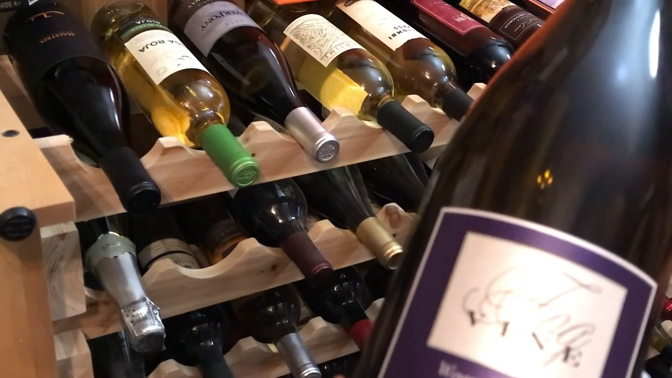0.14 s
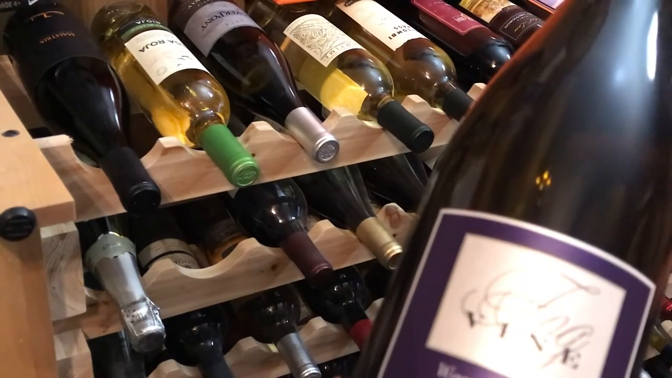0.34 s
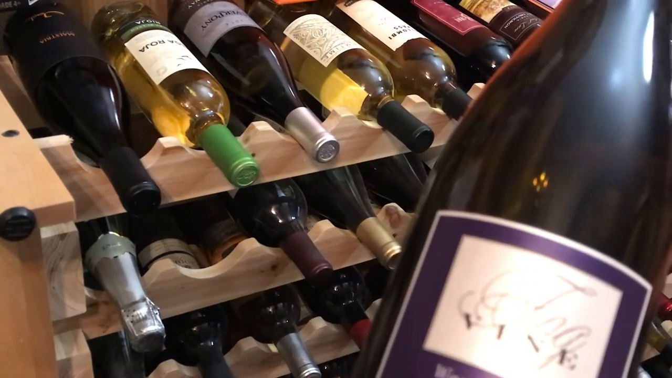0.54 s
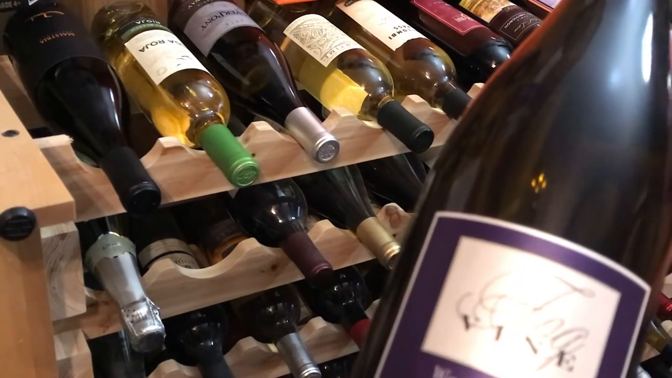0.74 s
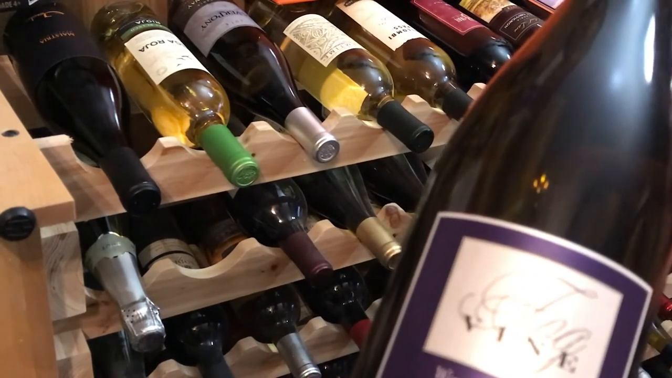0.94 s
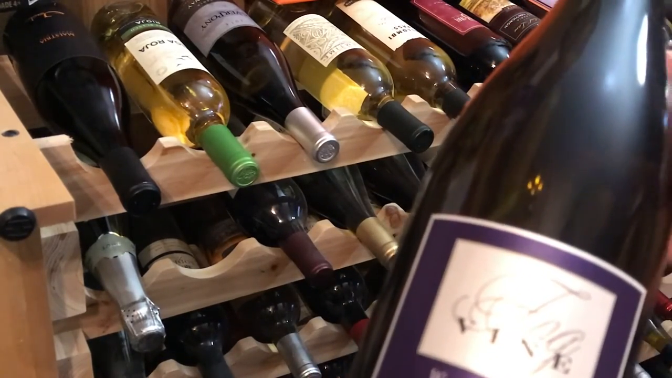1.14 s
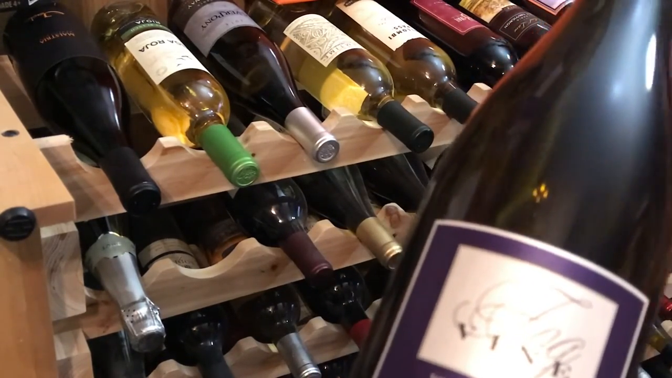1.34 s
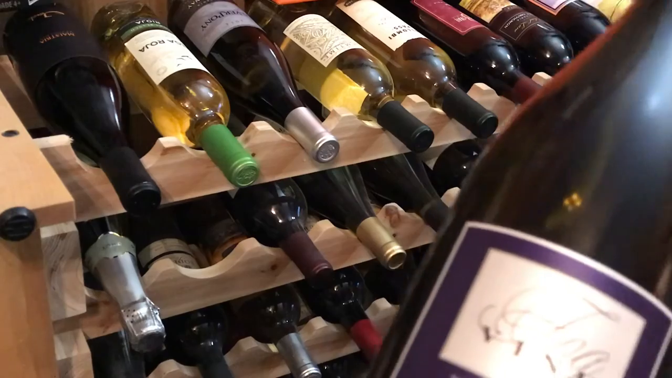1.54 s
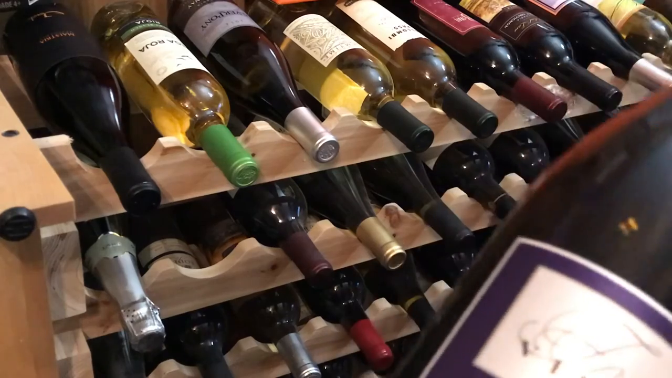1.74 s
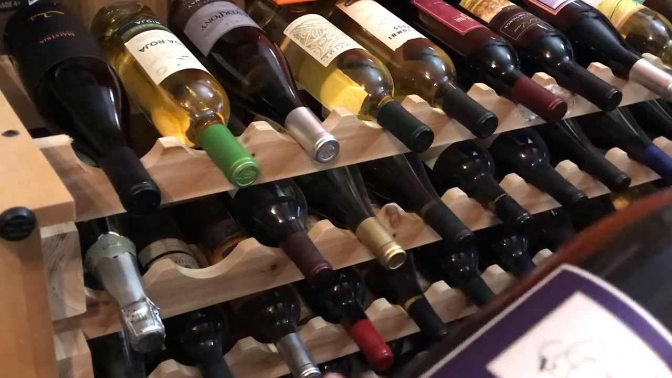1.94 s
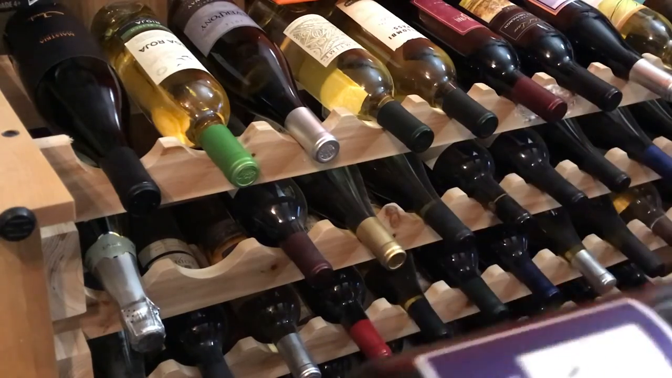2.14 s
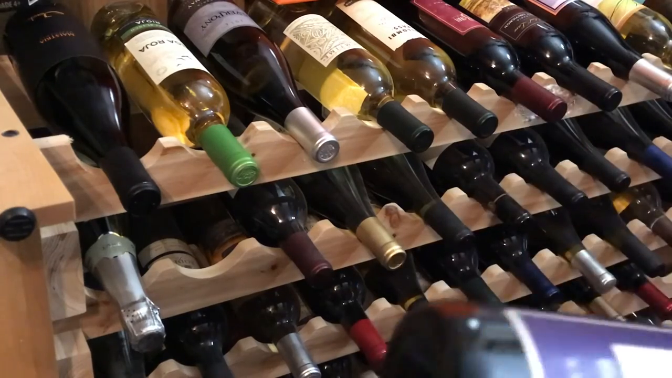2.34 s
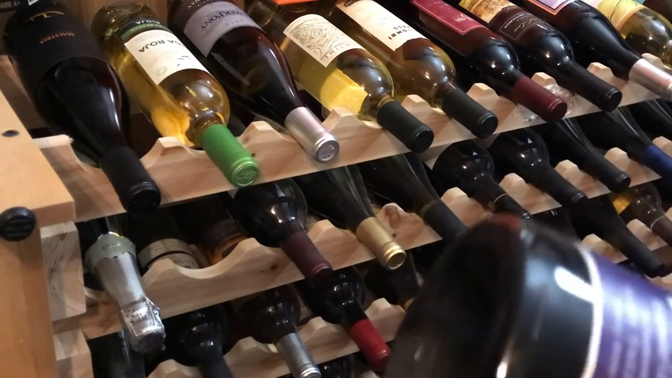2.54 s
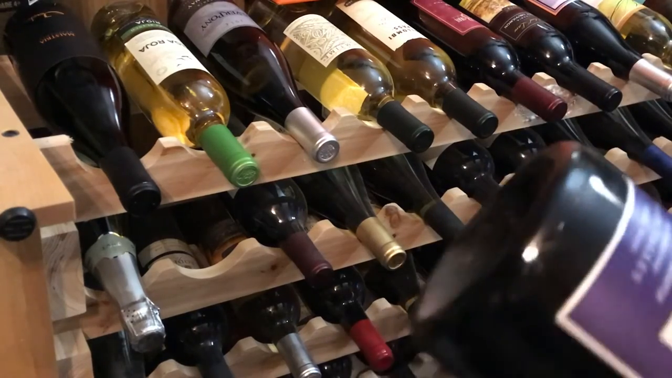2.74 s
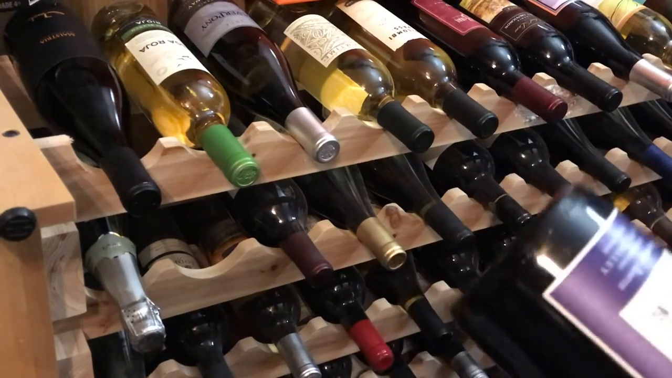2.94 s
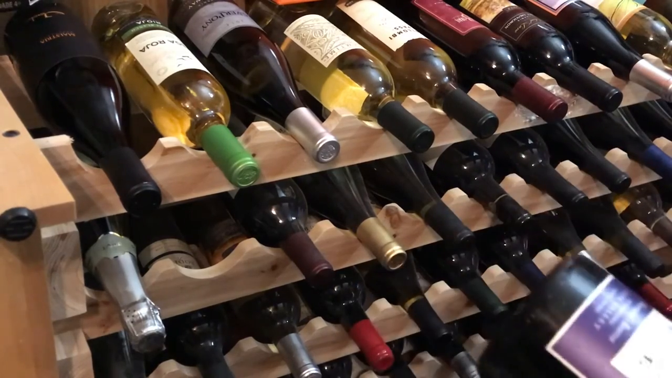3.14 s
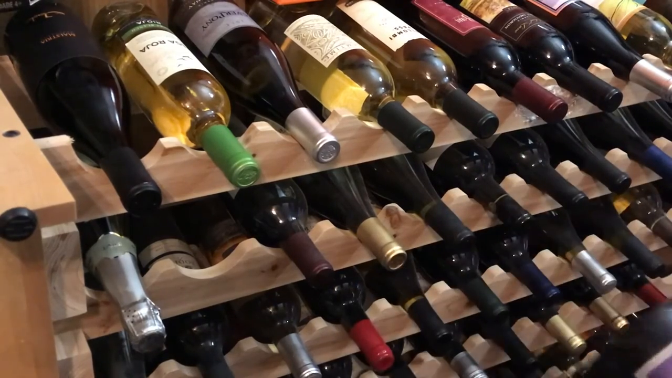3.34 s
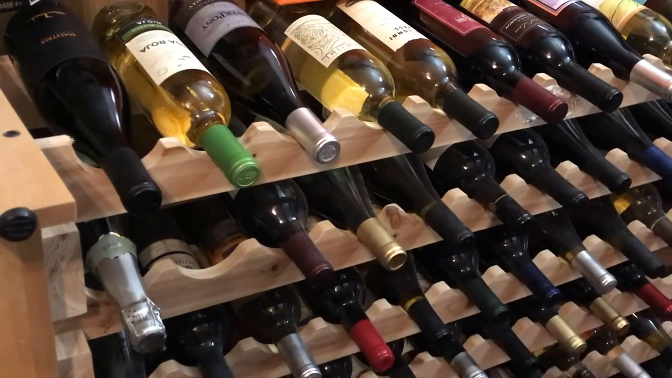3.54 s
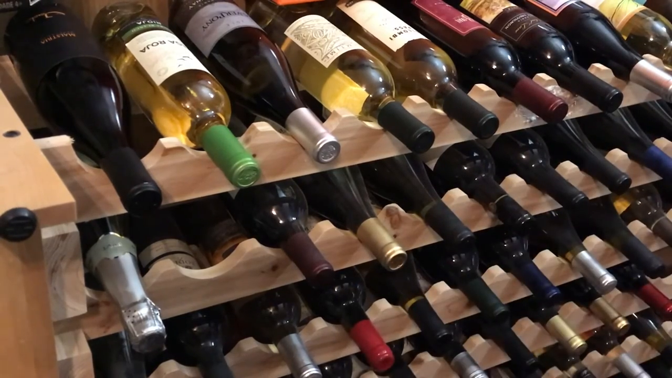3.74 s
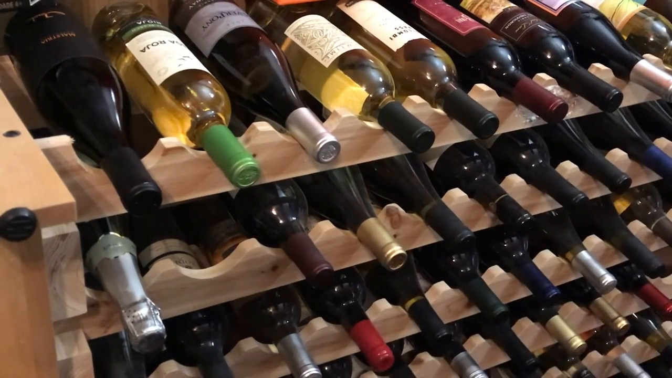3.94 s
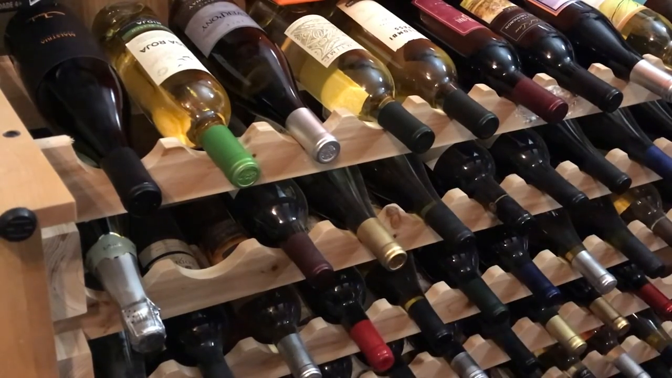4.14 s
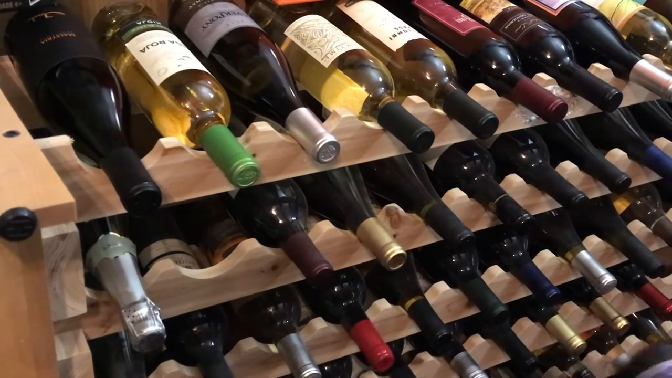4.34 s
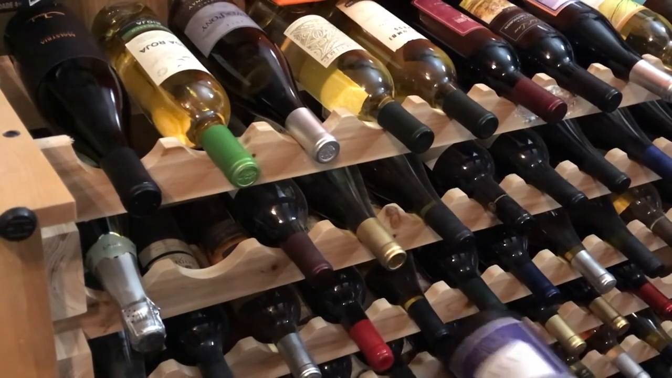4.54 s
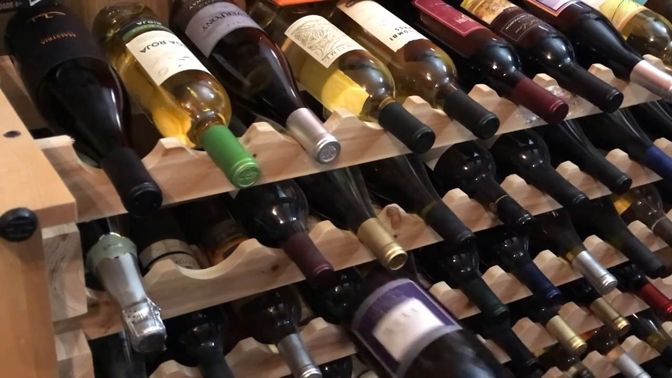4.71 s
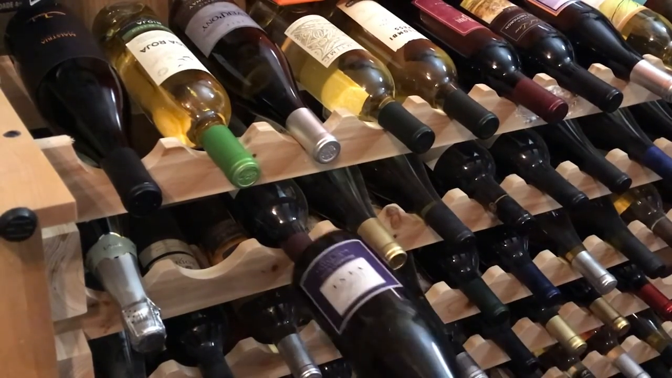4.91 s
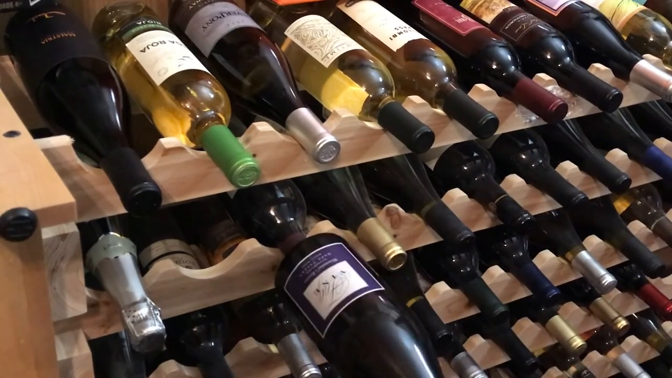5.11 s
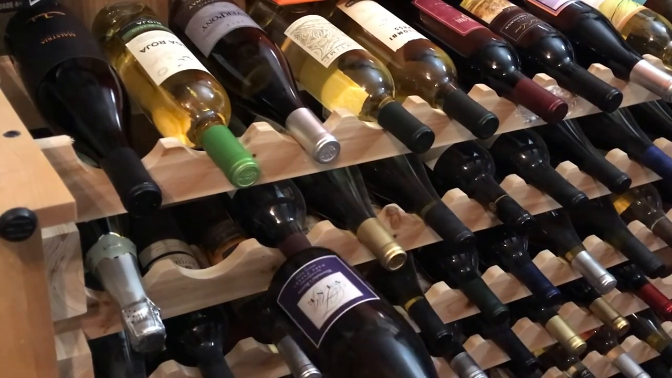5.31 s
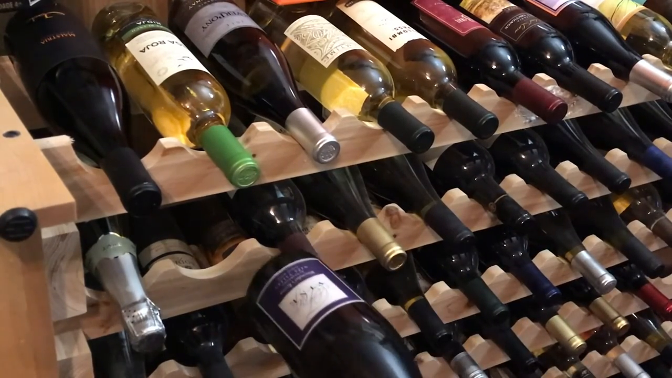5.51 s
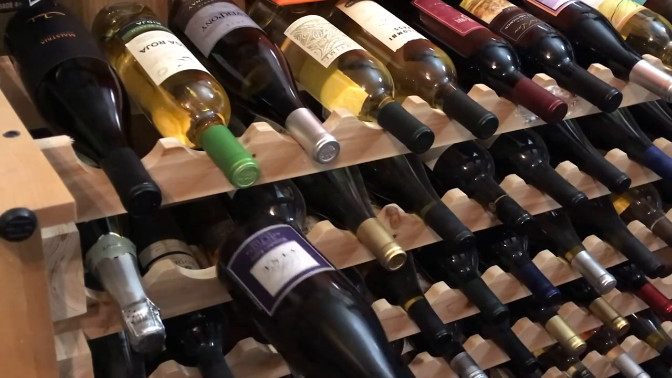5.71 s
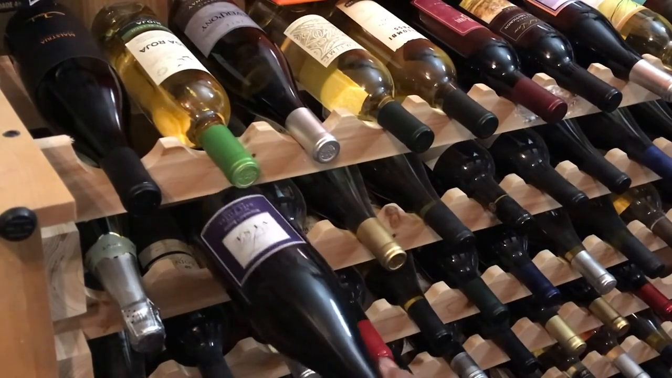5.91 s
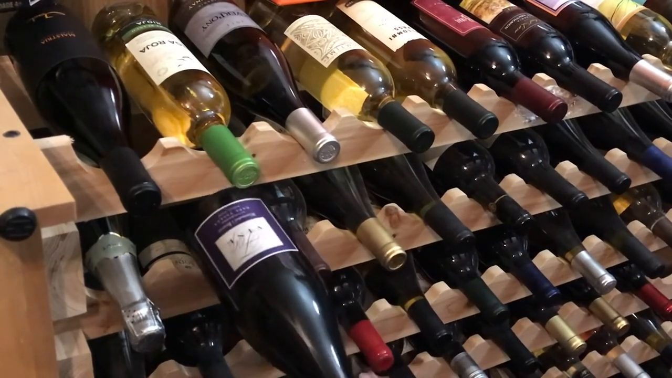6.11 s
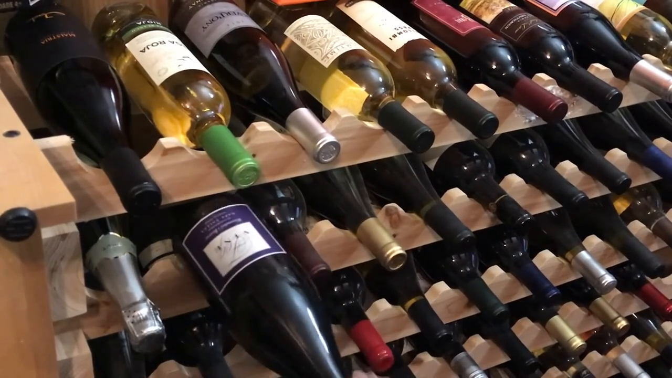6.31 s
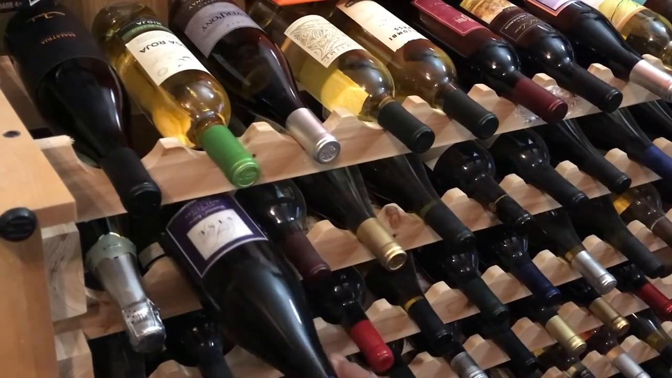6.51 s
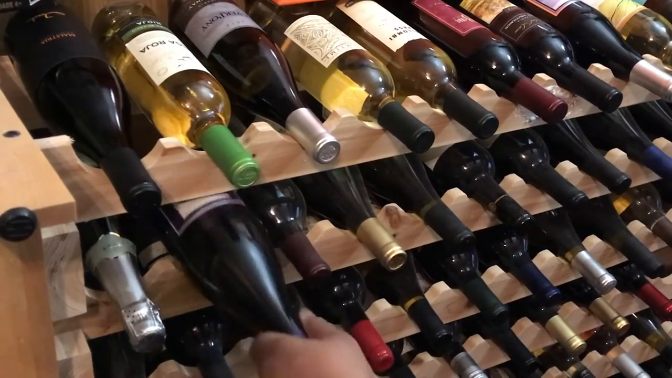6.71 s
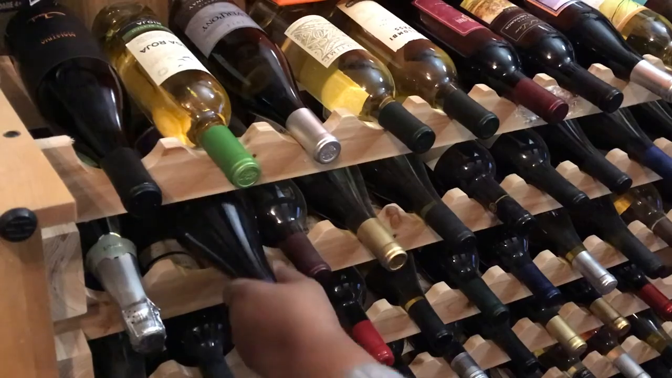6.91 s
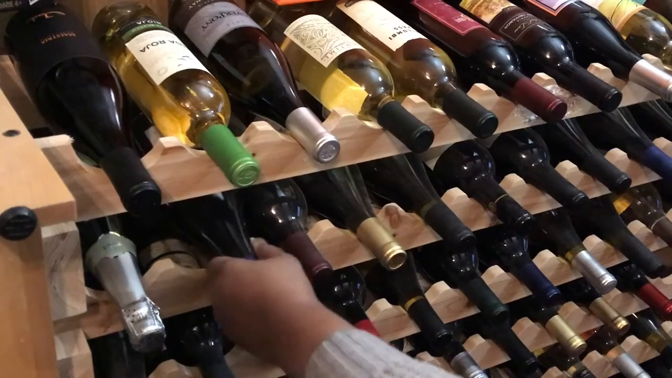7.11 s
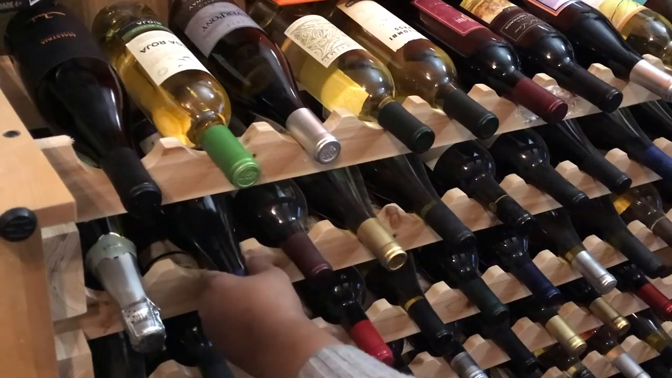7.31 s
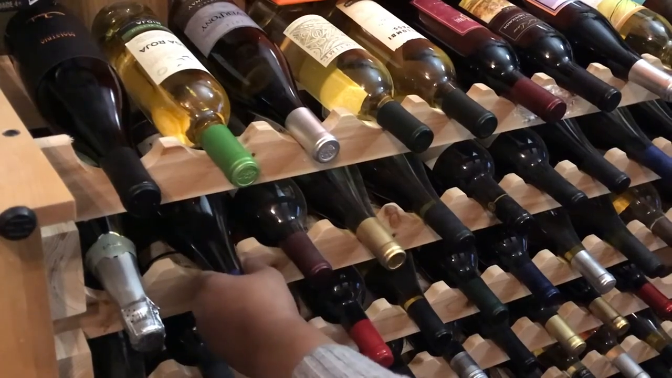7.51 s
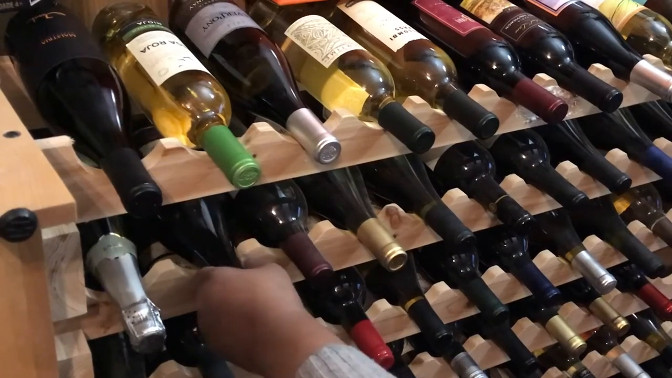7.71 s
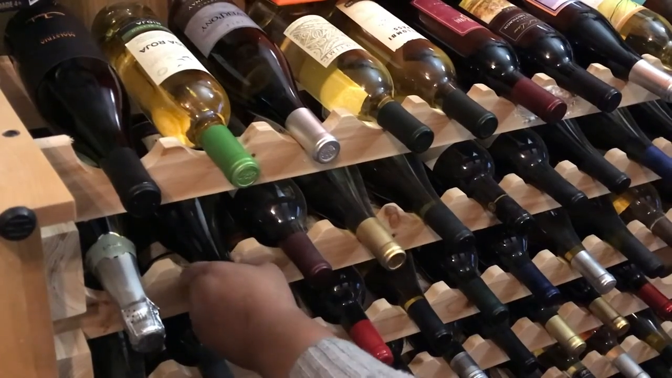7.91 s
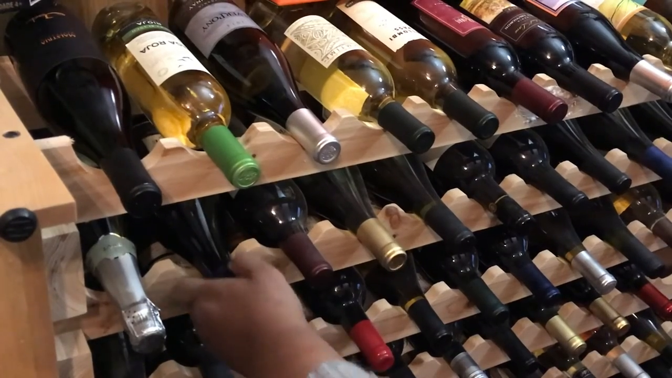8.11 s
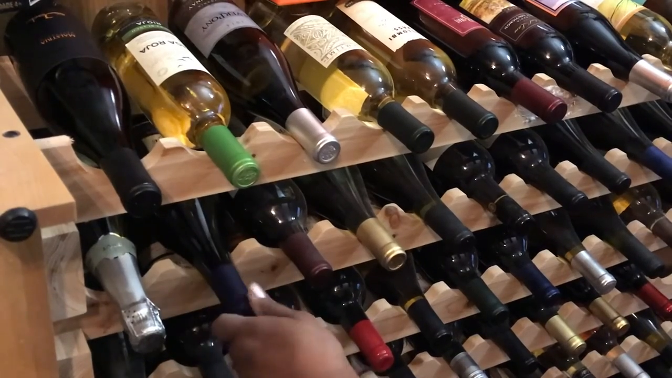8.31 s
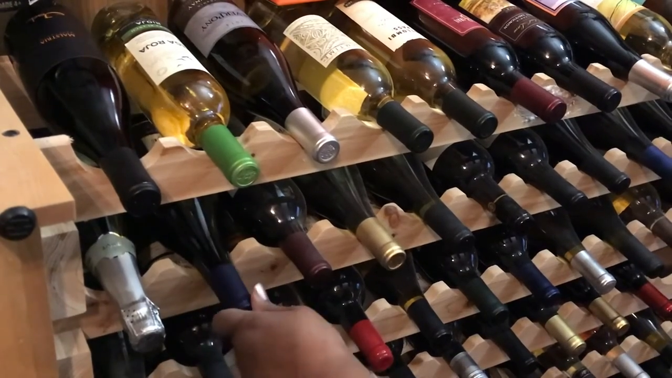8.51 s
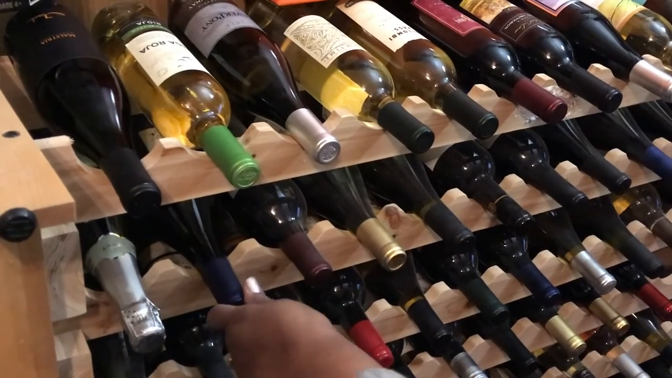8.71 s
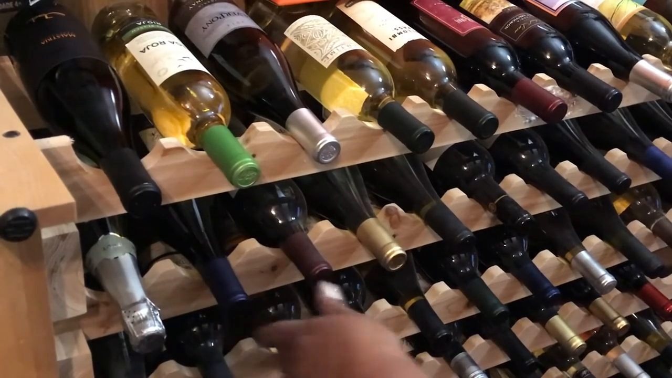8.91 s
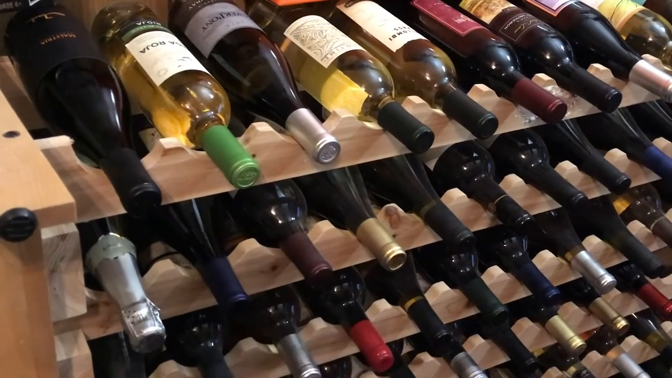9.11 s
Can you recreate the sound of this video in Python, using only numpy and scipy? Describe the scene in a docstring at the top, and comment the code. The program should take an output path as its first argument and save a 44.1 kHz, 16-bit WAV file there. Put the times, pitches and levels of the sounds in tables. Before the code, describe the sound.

In a quiet indoor room, fingertips tap a wine bottle with small bright ticks, then skin rubs and squeaks faintly on the glass as it is turned. A sharp clink against a neighbouring bottle follows, then wooden knocks, a short rising scrape and a loud glassy clunk as it slides into the rack. Close small microphone, faint air and hum.

```python
"""In a quiet room, a wine bottle is turned in the hand and then slid back into a full wooden rack.
Struck glass and wood are sums of dying tones set off by short blows; fingers, sleeve and sliding
contacts are friction noise, which also makes the glass sing. Squeaks are short gliding tones, and
creaks are trains of small slips. Room echoes, still air, a low rumble and a faint hum lie around it."""
import sys
import numpy as np
from scipy import signal
from scipy.fft import rfft, irfft, next_fast_len
from scipy.io import wavfile

SR = 44100
rng = np.random.default_rng(int(sys.argv[2]) if len(sys.argv) > 2 else 0)


def bounce(signal):
    """Save signal as a 16-bit WAV file at the path given by the first command-line argument."""
    frames = np.transpose(np.atleast_2d(signal))
    limited = np.clip(frames, -1, 1)
    pcm = np.round(limited * 32767).astype(np.int16)
    wavfile.write(sys.argv[1], SR, pcm)


N = 403507
TIME = np.arange(N) / SR
AGE = TIME[:SR]   # time since a blow, up to one second

# Tones of the bottle in the hand. Each row: pitch in Hz, level when struck in dB,
# time to fall 60 dB in seconds, level when rubbed in dB.
HELD_MODES = [(2220, -17.5, 0.23, -1.5), (2804, -23, 0.093, -10), (3622, -17, 0.13, 0.5),
              (3974, -6, 0.15, -4), (5460, -14.5, 0.041, -0.5), (5860, -16, 0.17, -4),
              (6216, -14.5, .085, -12), (7130, -24, 0.073, -22), (8020, -19.5, 0.086, -12),
              (11350, -19.5, 0.092, -6), (13060, -17, .08, -20)]
# When the sliding tones glide: start and end in seconds.
GLIDE_SPAN = (6.38, 6.67)


def from_db(db):
    """Turn decibels into a gain."""
    return np.exp(np.asarray(db) * (np.log(10) / 20))


def rms_one(x):
    """Scale a lasting sound to unit rms."""
    return x / np.sqrt(np.mean(x ** 2) + 1e-20)


def unit_blow(x):
    """Scale a blow to the energy of 20 ms at unit rms."""
    return x / np.sqrt(np.sum(x ** 2) / (.02 * SR) + 1e-20)


def at_hz(points, hz):
    """Read a table of (Hz, value) between its points, on a log-frequency axis."""
    f, value = np.transpose(points)
    return np.interp(np.log(hz), np.log(f), value)


def butter(x, hz, kind, order=2):
    """Filter out lows, highs or both, using only the past of the sound."""
    sos = signal.butter(order, np.clip(hz, 10, .45 * SR), kind, fs=SR, output="sos")
    return signal.sosfilt(sos, x)


def coloured(x, spectrum):
    """Shape a sound with a spectrum that falls away beyond its ends; rms 1."""
    size = next_fast_len(len(x))
    hz = np.maximum(np.arange(size // 2 + 1) * SR / size, 1)
    low_skirt = 1 / (1 + (.7 * spectrum[0][0] / hz) ** 4)
    high_skirt = 1 / (1 + (.7 * hz / spectrum[-1][0]) ** 6)
    gain = from_db(at_hz(spectrum, hz)) * low_skirt * high_skirt
    return rms_one(irfft(rfft(x, size) * gain, size)[:len(x)])


def drift(rate):
    """Wander at random between normal draws of spread 1, 'rate' draws a second."""
    knots = rng.standard_normal(4000)
    return np.interp(TIME * rate, np.arange(len(knots)), knots)


def grains(per_s, spread_db):
    """Scatter tiny slips of uneven size and sign at random times; rms 1."""
    chance = rng.random(N) * SR / per_s
    at = np.flatnonzero(chance < 1)
    out = np.zeros(N)
    size_db = spread_db * np.minimum(-np.log(chance[at]), 5)
    out[at] = from_db(size_db) * (-1) ** (at % 2)
    return rms_one(out)


def gritty(per_s):
    """Friction on an uneven surface: each range of pitch catches and lets go by itself; rms 1."""
    edges = np.geomspace(1500, 17000, 9)
    out = butter(grains(per_s, 3), edges[0], "low", order=4)
    for low, high in zip(edges, edges[1:]):
        out += butter(grains(per_s, 3), [low, high], "band") * from_db(2.2 * drift(28))
    return rms_one(out)


def dying(t60):
    """Envelope that falls 60 dB in t60 seconds."""
    return np.exp(-np.log(1000) * np.minimum(AGE / t60, 10))


def burst(t60):
    """Noise that dies away."""
    return rng.standard_normal(len(AGE)) * dying(t60)


def add(track, s, sound):
    """Mix a sound into a track at time s."""
    at = max(0, round(s * SR))
    track[at:at + len(sound)] += sound[:N - at]


def struck(modes, hard_hz, longer=1, spread_s=0.0016):
    """Tones ring after a blow; alternating signs let close pairs beat, and soft contacts lack treble."""
    out = np.zeros(len(AGE))
    for k, (hz, db, t60) in enumerate(modes):
        # each tone reaches the ear up to a few cycles late, by its own path
        lag = round(round(rng.random() * spread_s * hz) * SR / hz)
        age = AGE[:min(int(2 * t60 * longer * SR), len(AGE) - lag)]
        decay = np.exp(-np.log(1000) * age / (t60 * longer))
        wave = (-1) ** k * np.sin(2 * np.pi * hz * age) * decay
        out[lag:lag + len(age)] += from_db(db) / np.sqrt(1 + (hz / hard_hz) ** 4) * wave
    return out


def singing(friction, modes, hard_hz, longer):
    """Steady friction keeps tones ringing; rms 1."""
    return rms_one(signal.fftconvolve(friction, struck(modes, hard_hz, longer))[:N])


def shimmer(friction, ring_db):
    """The crowded high tones of the glass put a fine, glassy grain on friction noise; rms 1."""
    crowd = [(hz, 0, 0.0066) for hz in rng.uniform(3000, 16000, 70)]
    # the ring time factor of 0.22 shortens every tone
    return rms_one(friction + from_db(ring_db) * singing(friction, crowd, SR, 0.22))


def glass_song(friction, hard_hz):
    """Friction sets off each held-bottle tone in fits and starts; a shifting grip bends all; rms 1."""
    out = np.zeros(N)
    for hz, _, _, rubbed_db in HELD_MODES:
        fits = from_db(2.0 * np.minimum(drift(14), 1))
        width_hz = 9 * (hz / 2000) ** 1.5   # higher tones are broader
        ring = signal.lfilter(*signal.iirpeak(hz, hz / width_hz, fs=SR), friction * fits)
        out += from_db(rubbed_db) / np.sqrt(1 + (hz / hard_hz) ** 4) * rms_one(ring)
    bent_time = TIME + np.cumsum(0.00105 * drift(10)) / SR
    return rms_one(np.interp(bent_time, TIME, out))


def strokes(rows, attack_s, release_s):
    """Gain of movements (start, length, dB, swell dB): each sets in, swells or fades, and dies away."""
    arch_db = 1.5   # every movement presses this much harder in its middle than at its ends
    gain = np.zeros(N)
    for s, length, db, swell_db in rows:
        age = TIME[TIME < length + 10 * release_s]
        along = np.minimum(age / length, 1) - .5
        onset = (1 - np.exp(-age / attack_s)) ** 2
        release = np.exp(-np.maximum(age - length, 0) / release_s)
        level_db = db + swell_db * along - arch_db * (2 * along) ** 2
        add(gain, s, onset * release * from_db(level_db))
    return gain


def rubbing(rows, attack_s, release_s):
    """The same strokes drive several sounds: one gain for each level column."""
    gains = []
    for k in range(len(rows[0][3:])):
        one_level = [(s, length, levels[k], swell) for s, length, swell, *levels in rows]
        gains.append(strokes(one_level, attack_s, release_s))
    return gains


def background():
    """Still air is coloured noise, moving the arm adds lumpy low noise, and mains hum is a pure tone."""
    # Colour of the room air. Each row: pitch in Hz, level in dB.
    air_colour = [(32, -6), (59, -1), (130, -12), (405, -20.5), (476, -24), (1020, -25), (2990, -32),
                  (16000, -36)]
    # Colour of the rumble. Each row: pitch in Hz, level in dB.
    rumble_colour = [(26, -27), (45, -1.5), (87, -6.5), (125, -2), (315, -6.5), (699, -18), (6000, -35.5)]
    # The arm moves. Each row: start in seconds, length in seconds,
    # level in dB before the rumble trim, swell in dB.
    moves = [(2.68, 0.34, -52, 1.5), (3.4, 1.74, -60.5, 4.5), (5.78, 0.21, -48.5, -17),
             (6.2, 0.48, -65.5, 1), (6.72, 0.45, -55.5, 8), (8.3, 1.3, -60, 3.5)]
    still_db, trim_db = -70.5, -2   # rumble of the hand at rest before the trim; trim of all rumble
    air = from_db(-66.5) * coloured(rng.standard_normal(N), air_colour)
    handling = np.hypot(from_db(still_db), strokes(moves, attack_s=0.037, release_s=0.11))
    lumps = from_db(3 * drift(22))
    rumble = handling * from_db(trim_db) * lumps * coloured(rng.standard_normal(N), rumble_colour)
    hum = from_db(-71) * np.sin(2 * np.pi * 60 * TIME)
    return air + rumble + hum


def sleeve():
    """The knitted sleeve brushes along as the arm moves: dull, grainy friction of many small slips."""
    # Colour of the cloth. Each row: pitch in Hz, level in dB.
    cloth_colour = [(70, -7.5), (194, -7.5), (714, -9.5), (2280, -8), (3320, -17.5), (6500, -28),
                    (12000, -34)]
    # The brushes. Each row: start in seconds, length in seconds, level in dB, swell in dB.
    brushes = [(1.7, 0.23, -70, -3), (2.04, 0.65, -68, -4), (2.72, 0.5, -60.5, 11.5),
               (3.3, 0.64, -73.5, 18.5), (4.0, 0.39, -68.5, 19.5), (7.87, 0.026, -53, -4.5)]
    cloth = coloured(grains(4000, 2.1), cloth_colour)
    return strokes(brushes, attack_s=0.039, release_s=.07) * from_db(2 * drift(30)) * cloth


def thumps():
    """The hand shifts its grip: soft flesh gives a dull, short push."""
    # Grip shifts. Each row: time in seconds, level in dB.
    shifts = [(0.136, -49.5), (1.175, -49), (1.887, -54.5), (2.208, -58), (3.441, -60)]
    # Colour of a thump. Each row: pitch in Hz, level in dB.
    thump_colour = [(40, -7.5), (141, -0.5), (527, -21), (2490, -28.5), (3340, -37), (6000, -43.5)]
    out = np.zeros(N)
    for s, db in shifts:
        noise = coloured(rng.standard_normal(len(AGE)), thump_colour)
        add(out, s, from_db(db) * unit_blow(noise * dying(0.051) * (1 - dying(0.014))))
    return out


def creak():
    """The loaded rack sticks and slips at an uneven pace: a soft, dull ticking, and single slips."""
    # Runs of creaking. Each row: start in seconds, length in seconds, level in dB,
    # swell in dB, typical slips per second.
    runs = [(4.552, 0.1, -61, -6, 74), (4.708, 0.1, -60.5, -7, 172), (4.811, 0.09, -63, 7.5, 65)]
    # Single slips. Each row: time in seconds, level in dB.
    single_slips = [(4.459, -59), (4.472, -65), (4.495, -59.5), (5.037, -63), (5.332, -63.5), (5.376, -64)]
    # Colour of the runs. Each row: pitch in Hz, level in dB.
    creak_colour = [(120, -8), (250, -6.5), (480, 0), (720, 3), (1080, -12), (1600, -15)]
    paces = [(s + length / 2, pace) for s, length, db, swell, pace in runs]
    per_s = np.interp(TIME, *np.transpose(paces))
    # a slip happens whenever the running count passes a whole number
    count = np.cumsum(per_s * from_db(2.0 * drift(50))) / SR
    ticks = np.diff(np.floor(count), prepend=0)
    sizes = from_db(2.5 * drift(80)) / np.sqrt(np.abs(per_s) + 1)
    gain = strokes([run for *run, pace in runs], attack_s=0.011, release_s=0.012)
    out = coloured(ticks * sizes, creak_colour) * gain
    for s, db in single_slips:
        add(out, s, from_db(db) * unit_blow(butter(burst(0.025), [260, 850], "band", order=3)))
    return out


def hand():
    """Skin hisses over the glass with wavering pressure and makes it sing faintly."""
    # Strokes of the hand. Each row: start in seconds, length in seconds, swell in dB,
    # level of the palm's hiss in dB, of the fingertips' hiss in dB, of the singing glass in dB.
    rubs = [(1.44, 0.22, -9, -86, -81, -72), (1.61, 0.19, -2, -73, -66, -65.5),
            (1.775, 0.064, 7, -54, -50, -62), (1.84, 0.23, -5, -62, -63, -70),
            (2.05, 0.12, -3.5, -58, -57, -75), (2.17, 0.18, -11, -69, -79, -67),
            (2.28, 0.37, -0.5, -55.5, -60, -66.5), (2.62, 0.26, -1.5, -63, -60.5, -65),
            (3.03, 0.064, -4, -58, -57, -78), (3.32, 0.049, -9, -58, -59, -59),
            (3.45, 0.16, -13, -63, -69, -64), (3.66, 0.17, -9, -67, -61.5, -78),
            (3.84, 0.1, -10, -62.5, -57, -90), (4.02, 0.46, -13.5, -66, -69, -83),
            (4.12, 0.028, -17, -44, -63, -51), (7.88, 0.25, -15, -70, -79, -85),
            (8.11, 0.17, 4, -76.5, -69, -83)]
    # Colour of the palm's broad hiss. Each row: pitch in Hz, level in dB.
    palm_colour = [(1500, -24), (2210, -4.5), (4700, -1.5), (6060, 3), (9600, -1.5), (10600, -2.5)]
    # Colour of the dry fingertips' fine hiss. Each row: pitch in Hz, level in dB.
    fine_colour = [(7500, -26), (9700, 1), (10500, -12), (11900, 4), (16000, 4)]
    skin = gritty(6000) * from_db(0.8 * drift(22.1))
    palm, tips, sing = rubbing(rubs, attack_s=0.026, release_s=0.019)
    grain = shimmer(skin, ring_db=-11)
    hiss = palm * coloured(grain, palm_colour) + tips * coloured(grain, fine_colour)
    return hiss + sing * glass_song(skin, 15000)


def squeaks():
    """Skin sticks and slips on glass, fast and nearly regularly: a short, gliding, wavering tone."""
    # The squeaks. Each row: start in seconds, length in seconds, middle pitch in Hz,
    # glide from start to end as a share of the pitch, level in dB.
    notes = [(1.283, 0.24, 3600, 0.02, -78), (1.416, 0.8, 2218, -0.0043, -67.5),
             (2.08, 0.11, 2213, -0.0034, -63), (1.623, 0.15, 2745, -0.013, -66),
             (1.692, 0.29, 2722, -0.012, -61.5), (2.077, 0.033, 2045, 0.031, -59),
             (2.235, 0.027, 1870, 0.028, -50), (2.38, 0.55, 3615, 0.0043, -66),
             (3.326, 0.081, 5930, 0.024, -62.5), (4.125, 0.2, 2272, -0.0023, -63),
             (4.214, 0.18, 4010, 0.0026, -61.5), (4.293, 0.091, 2240, -.005, -66),
             (7.971, 0.13, 2770, -0.039, -70.5), (8.087, 0.034, 1220, -0.089, -55),
             (8.128, 0.059, 2160, 0.069, -71), (8.148, 0.23, 2770, -0.037, -74)]
    out = np.zeros(N)
    for s, length, hz, glide, db in notes:
        along = np.minimum(AGE / length, 1)
        pitch = hz * (1 + glide * (along - .5) + 0.013 * drift(730)[:len(AGE)])
        swell = np.sin(np.pi * np.sqrt(along))
        add(out, s, from_db(db) * swell * np.sin(2 * np.pi * np.cumsum(pitch) / SR))
    return out


def swept(times, first_hz, last_hz, width_hz):
    """Friction noise in a resonance that glides during the slide; rms 1."""
    turn = np.exp(2j * np.pi * np.cumsum(np.interp(times, GLIDE_SPAN, [first_hz, last_hz])) / SR)
    slow_noise = butter(rng.standard_normal(len(times)) / turn, width_hz / 2, "low", order=1)
    return rms_one(np.real(turn * slow_noise))


def slide():
    """Glass and paper label catch on the wood grain, driving rail and bottle; the neck scrapes last."""
    # Slides on the rail. Each row: start in seconds, length in seconds, swell in dB,
    # level of the wood's gain in dB, level of the singing glass in dB.
    slides = [(6.32, 0.35, 10.5, -52.5, -66), (6.714, 0.016, 0, -45, -50.5)]
    # Resonances of the sliding contact, most of them rising as the bottle goes in.
    # Each row: first pitch in Hz, last pitch in Hz, width in Hz, level in dB.
    resonances = [(602, 700, 22, -3.5), (756, 1195, 45, -7), (945, 943, 50, -1), (1430, 1570, 55, -11),
                  (2060, 2310, 55, -6.5), (2970, 3200, 91, -13), (4100, 4080, 80, -15),
                  (5080, 5900, 150, -27)]
    # Colour of the scraped wood. Each row: pitch in Hz, level in dB.
    scrape_colour = [(150, -26), (341, 0.5), (440, -15), (820, 4), (1310, -9), (2270, -6.5), (2800, -13.5),
                     (4200, -15.5), (6000, -17.5), (15000, -19)]
    # Last push, foil neck against the rail. Each row: start in seconds, length in seconds,
    # level in dB, swell in dB.
    push = [(8.522, 0.075, -43, -1.5)]
    # Tones of the neck on the rail. Each row: pitch in Hz, level in dB, time to fall 60 dB in seconds.
    neck_modes = [(154, -6.5, 0.12), (313, -4, 0.023), (650, -6.5, 0.069), (916, 0.5, 0.021),
                  (1396, 0.5, 0.041), (2110, 10.5, 0.0051), (2570, -1, 0.018), (2774, -8, 0.12),
                  (3965, 3, 0.017), (4430, 5.5, 0.01), (12200, -5, 0.032)]
    friction = gritty(2200) * from_db(1.1 * drift(140))
    scrape, sing = rubbing(slides, attack_s=0.0062, release_s=0.012)
    rail, start = np.zeros(N), slides[0][0]
    for first, last, width, db in resonances:
        catch = from_db(db + 2.0 * drift(16)[:len(AGE)])
        add(rail, start, catch * swept(start + AGE, first, last, width))
    # the resonances come out as the bottle's weight settles on the rail
    rail *= from_db(np.interp(TIME, GLIDE_SPAN, [-4, 0]))
    wood = from_db(-2) * coloured(shimmer(friction, ring_db=-8), scrape_colour)
    neck = singing(friction, neck_modes, 15000, 1.0) + from_db(-11) * friction   # with a foil hiss
    neck *= strokes(push, attack_s=0.017, release_s=0.021)
    return scrape * (wood + rail) + sing * glass_song(friction, 4500) + neck


def rail_spot():
    """Every spot on the rails has its own crowd of tones, the high ones dying sooner."""
    # Nominal range of the rail's tones: lowest pitch in Hz, highest pitch in Hz,
    # time to fall 60 dB at 1 kHz in seconds.
    low, high, t60 = (433, 3310, 0.028)
    pitches = np.geomspace(low, high, 80) * (1 + .012 * rng.standard_normal(80))
    return [(hz, 0, t60 * np.sqrt(1000 / hz)) for hz in rng.permutation(pitches)]


def knocks():
    """Glass chatters briefly on a rail: the contact cracks, the rail knocks, frame and shelf ring."""
    # The knocks. Each row: time in seconds, frame level in dB, rail level in dB,
    # contact pitch in Hz, crack level in dB, top of the crack in Hz.
    hits = [(0.365, -64, -66.5, 1700, -71, 3000), (3.951, -61, -56.5, 1200, -67, 4000),
            (4.249, -68, -58, 1170, -84, 3030), (4.362, -53, -52.5, 1270, -64, 5000),
            (4.376, -55, -57, 1800, -64, 5000), (4.394, -53, -51.5, 1640, -59.5, 5930),
            (4.895, -63, -40.5, 1340, -39.5, 16100), (4.947, -52, -50, 603, -73, 3000),
            (5.806, -55.5, -39, 1780, -49, 4800), (5.811, -53, -41.5, 900, -47, 3500),
            (5.883, -44, -40, 1640, -44, 4900), (5.977, -54.5, -58, 815, -65.5, 3900),
            (6.131, -45.5, -42.5, 790, -57, 4450), (6.305, -66, -58, 1230, -61, 8970),
            (6.349, -40.5, -34.5, 755, -52, 3000), (6.719, -53.5, -73, 925, -47.5, 12800),
            (6.941, -64, -40, 714, -47, 14000), (7.0284, -34.5, -28, 1120, -43, 4500),
            (7.132, -61, -51, 1040, -66.5, 5000), (7.164, -49, -44, 1000, -68, 5060),
            (7.2014, -49, -44, 910, -80, 5000), (7.232, -50.5, -56.5, 1110, -72, 7100),
            (7.333, -53, -64.5, 720, -75, 3990), (7.539, -60.5, -60.5, 1060, -75.5, 4070),
            (7.594, -44.5, -49.5, 2010, -47.5, 16800), (7.597, -39.5, -40.5, 680, -49.5, 2940),
            (7.625, -51, -34, 860, -50, 3030), (7.657, -52, -48, 905, -65, 2480),
            (7.741, -50, -70, 486, -70, 2430), (8.748, -63, -65, 1500, -79, 5070)]
    # Tones of the rack's frame. Each row: pitch in Hz, level in dB, time to fall 60 dB in seconds.
    frame_modes = [(111.7, -2.5, 0.016), (151, -3.5, 0.19), (195, 1, 0.15), (269, 5.5, 0.038),
                   (329, -7, 0.13), (372, -2.5, 0.12), (422, -7, 0.088), (536, -3.5, 0.095),
                   (642, 2, 0.079)]
    # Tones of the loaded shelf after every knock. Each row: pitch in Hz, level in dB,
    # time to fall 60 dB in seconds.
    shelf_modes = [(645, -0.5, 0.17), (912, -4, 0.35), (1250, -7.5, .15), (1595, -9.5, .3),
                   (2250, -7.5, 0.29)]
    out = np.zeros(N)
    for s, frame_db, rail_db, contact_hz, crack_db, top_hz in hits:
        push = from_db(-24) * burst(0.045)
        push[0] += 1
        push = butter(push, 1.72 * contact_hz, "low")
        push = butter(push, 110.8, "high")   # a contact is too brief to push below this
        # the bottle bounces on the springy contact, which favours one pitch; the rail rings broadly
        contact = signal.lfilter(*signal.iirpeak(contact_hz, 3.2, fs=SR), push)
        ring = signal.fftconvolve(push, struck(rail_spot(), 4400, spread_s=0.0034))[:len(AGE)]
        shelf = struck(shelf_modes, 2 * 1.72 * contact_hz)
        rail = unit_blow(contact) + from_db(-3) * unit_blow(ring) + from_db(-15) * unit_blow(shelf)
        frame = butter(struck(frame_modes, contact_hz, spread_s=0.00816), [50, 750], "band")
        # a sharp snap with a fainter, longer rattle
        crack = (burst(0.024) + from_db(-13) * burst(0.088)) * (1 - dying(0.018))
        crack = butter(butter(crack, 1100, "high"), [0.37 * top_hz, top_hz], "band", order=1)
        add(out, s, from_db(frame_db) * unit_blow(frame))
        add(out, s, from_db(rail_db) * unit_blow(rail))
        add(out, s, from_db(crack_db) * unit_blow(crack))
    return out


def clinks(modes, taps, tick_db, tick_t60):
    """A tiny crack, and a ring; a loosely held object rings longer and a shade higher."""
    out = np.zeros(N)
    for s, db, hard_hz, longer in taps:
        sharper = 1 + 0.0018 * max(longer - 1, 0)
        shifted = [(hz * sharper, level, t60) for hz, level, t60 in modes]
        ring = struck(shifted, hard_hz, longer, spread_s=0.0017)
        tick = butter(butter(burst(tick_t60), 730, "high"), hard_hz, "low")
        add(out, s, from_db(db) * (ring + from_db(tick_db) * tick))
    return out


def foil_cap():
    """The foil cap ticks against the rack: three high, quickly dying tones and a crack."""
    # Tones of the cap. Each row: pitch in Hz, level in dB, time to fall 60 dB in seconds.
    modes = [(7400, -7.5, 0.057), (9300, -4, .06), (11900, 0, 0.082)]
    # The ticks. Each row: time in seconds, level in dB, hardness in Hz, ring time factor.
    taps = [(6.016, -60.5, 16000, 0.91), (6.127, -49, 16000, 0.24), (8.823, -49, 8000, 0.97)]
    return clinks(modes, taps, tick_db=-6.0, tick_t60=0.043)


def neighbours():
    """Two bottles in the rack are struck, one in front and one deep inside; each rings its own tones."""
    # Tones of the first neighbour. Each row: pitch in Hz, level in dB, time to fall 60 dB in seconds.
    front_modes = [(1873, -15, .17), (2261, -11, .13), (2646, -4, .26), (2742, 1, .19), (3010, -12, .07),
                   (3192, -7, .16), (3736, -11, .15), (4630, -13, .17), (5405, -12, .14), (6094, -13, .15),
                   (7220, -7, .04)]
    # Tones of the deep neighbour. Each row: pitch in Hz, level in dB, time to fall 60 dB in seconds.
    deep_modes = [(1689, -4, .32), (2204, -3, .28), (2645, -14, .3), (3204, -6, .21), (3494, -13, .18),
                  (3791, 0, .19), (4996, -11, .2), (5258, -11, .16), (5750, -14, .12), (6772, -10, .09),
                  (7704, -15, .12), (7860, -15, .1), (8670, -4, .085), (11540, -14, .08)]
    # Hits on the first neighbour. Each row: time in seconds, level in dB, hardness in Hz,
    # ring time factor.
    front_taps = [(4.8942, -31.5, 14000, 0.84), (5.248, -53.5, 2260, 1), (7.027, -31.5, 2800, 0.23)]
    # Hits on the deep neighbour. Each row: time in seconds, level in dB, hardness in Hz,
    # ring time factor.
    deep_taps = [(6.941, -29, 14060, 1.22)]
    front = clinks(front_modes, front_taps, tick_db=-25.5, tick_t60=0.05)
    return front + clinks(deep_modes, deep_taps, tick_db=-64.5, tick_t60=0.069)


def clack():
    """Two bottles bounce on their glass contact: a hollow clack, then a shrill swell as they touch."""
    # Tones of the clack. Each row: pitch in Hz, level in dB, time to fall 60 dB in seconds.
    modes = [(545, -21, 0.17), (1380, -5, 0.015), (1550, 1.5, 0.012), (2640, -4.5, 0.045)]
    shrill_length_s, shrill_hz = .0105, 2720
    out = np.zeros(N)
    add(out, 4.8955, from_db(-20) * struck(modes, SR))
    swell = np.sin(np.pi * np.minimum(AGE / shrill_length_s, 1))
    add(out, 4.8995, from_db(-20) * swell * np.sin(2 * np.pi * shrill_hz * AGE))
    return out


def held_bottle():
    """Contacts on the bottle in the hand, such as finger taps, set its glass ringing."""
    # The contacts. Each row: time in seconds, level in dB, hardness in Hz, ring time factor.
    taps = [(.001, -40, 7400, 1.5), (.017, -44.5, 12000, 0.47), (.029, -41.5, 10000, 1.1),
            (0.413, -48, 4970, 0.78), (.462, -41.5, 8950, 0.66), (0.469, -35.5, 9600, 1.04),
            (.492, -44, 14000, 0.63), (0.806, -51.5, 4120, 0.86), (.863, -38, 8800, 1.06),
            (.933, -45.5, 3080, 0.91), (1.482, -64, 12000, 0.89), (6.941, -22, 11700, 1.32)]
    modes = [mode for *mode, rubbed_db in HELD_MODES]
    return clinks(modes, taps, tick_db=-1.0, tick_t60=0.0033)


def room(x):
    """Scattered echoes off racks and walls build up quickly and die sooner in the high treble."""
    # Echo times. Each row: pitch in Hz, time to fall 60 dB in seconds.
    echo_t60 = [(100, 0.21), (500, 0.28), (2000, .27), (6000, 0.17), (15000, 0.043)]
    tail = np.zeros(len(AGE))
    for low in 60 * 2. ** np.arange(9):   # one octave at a time
        octave = butter(rng.standard_normal(len(AGE)), [low, 2 * low], "band")
        tail += octave * dying(at_hz(echo_t60, low * np.sqrt(2)))
    tail = tail * (1 - dying(0.012)) / np.sqrt(.016 * SR)
    return x + from_db(-9) * signal.fftconvolve(x, tail)[:N]


def scene():
    """Sources echo in the room; the clack is close and heard dry, and so is the background."""
    soft = sleeve() + thumps() + creak() + hand() + squeaks()
    hard = slide() + knocks() + foil_cap() + neighbours() + held_bottle()
    return (background() + room(soft + hard) + clack())[None]


def record(dry):
    """A small microphone loses the deepest bass; the top is cut steeply at 16 kHz."""
    thin = butter(dry, 33, "high", order=3)
    return signal.sosfilt(signal.ellip(10, .2, 70, 16000, fs=SR, output="sos"), thin)


dry = scene()
out = record(dry)
bounce(out)
```